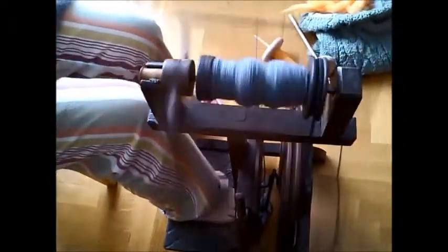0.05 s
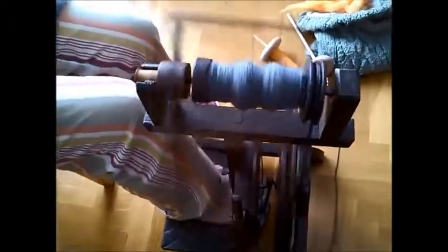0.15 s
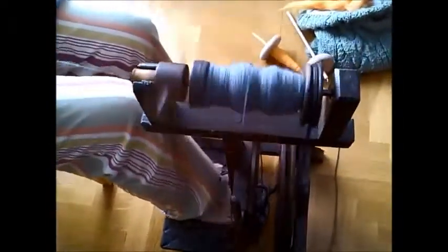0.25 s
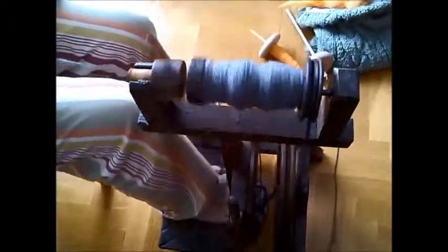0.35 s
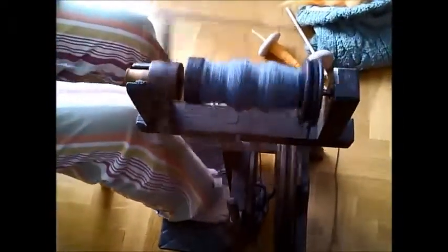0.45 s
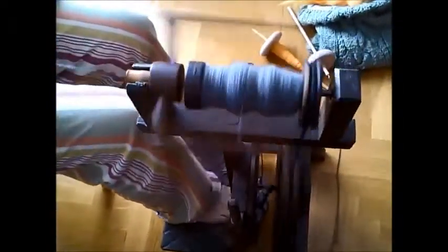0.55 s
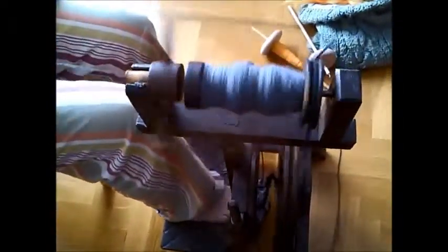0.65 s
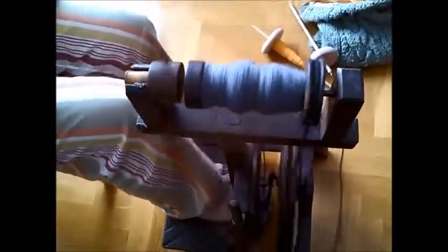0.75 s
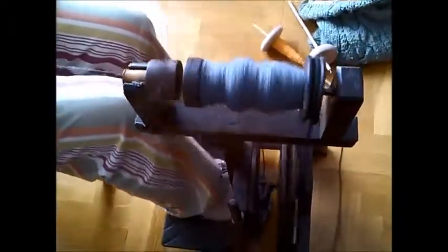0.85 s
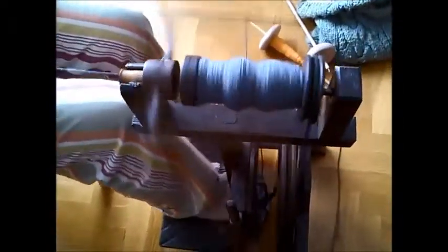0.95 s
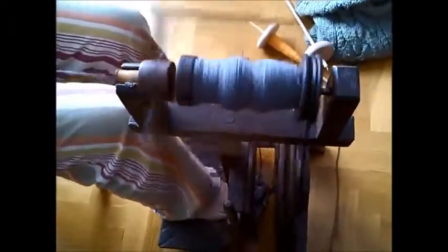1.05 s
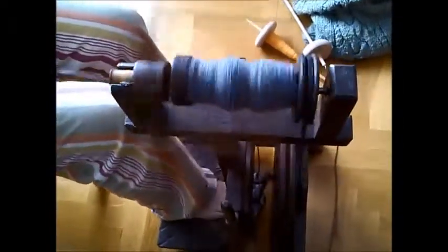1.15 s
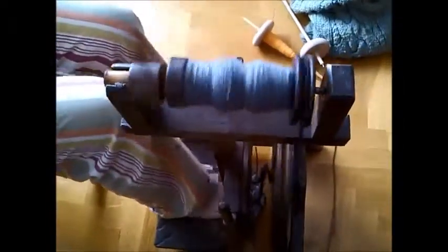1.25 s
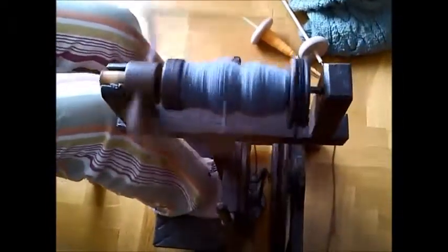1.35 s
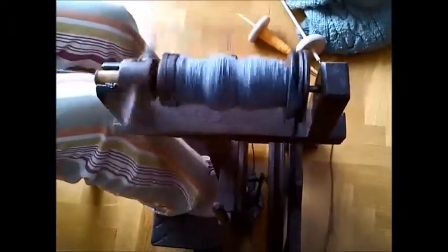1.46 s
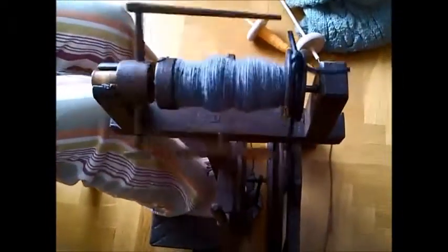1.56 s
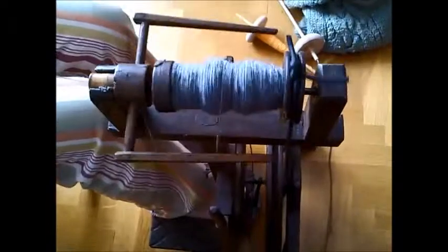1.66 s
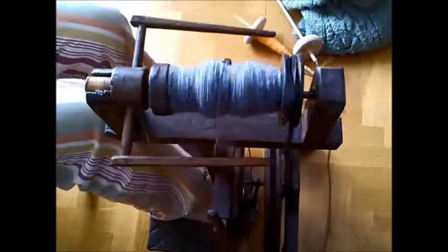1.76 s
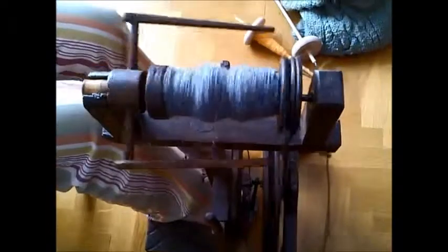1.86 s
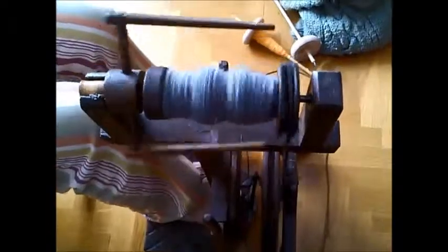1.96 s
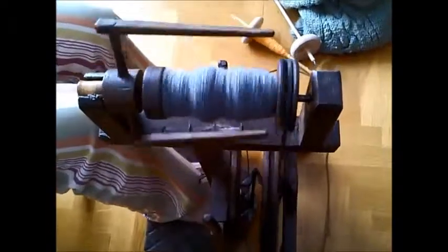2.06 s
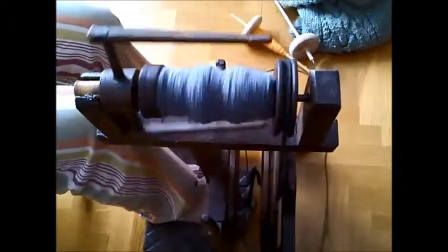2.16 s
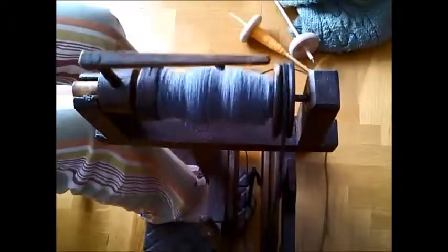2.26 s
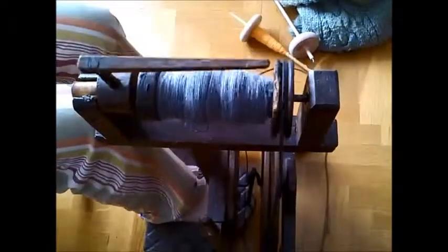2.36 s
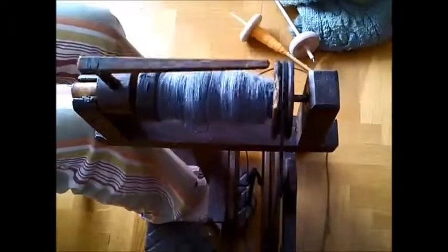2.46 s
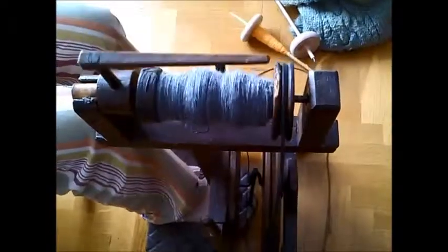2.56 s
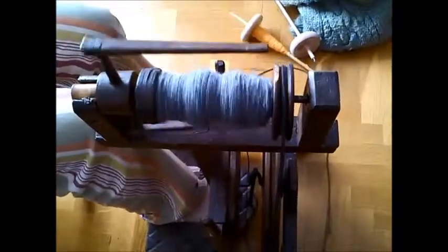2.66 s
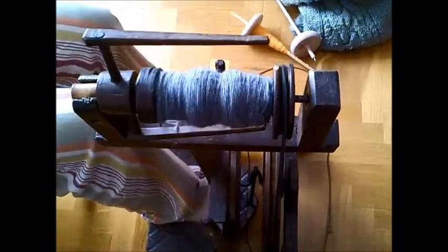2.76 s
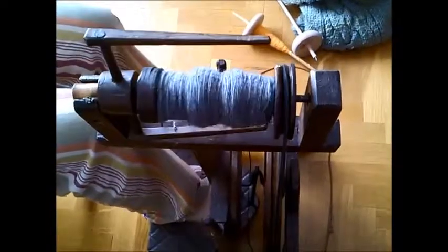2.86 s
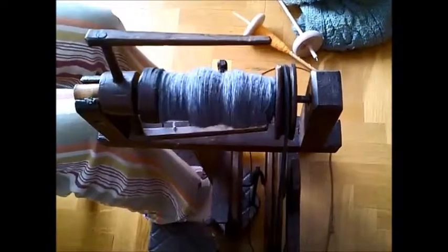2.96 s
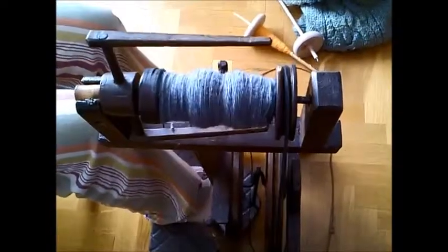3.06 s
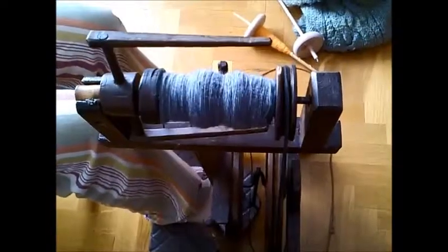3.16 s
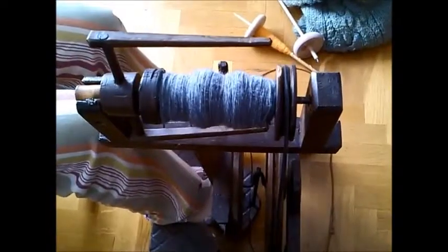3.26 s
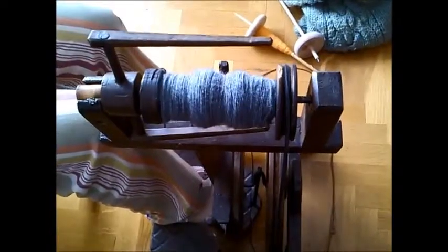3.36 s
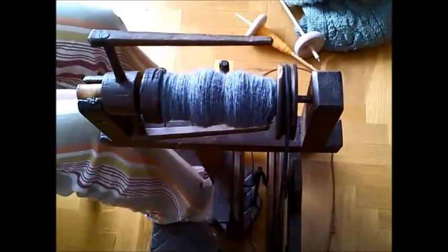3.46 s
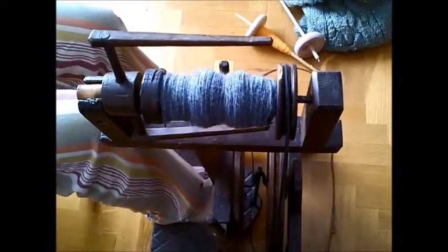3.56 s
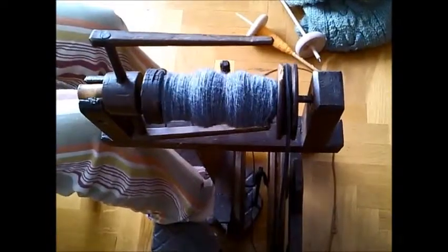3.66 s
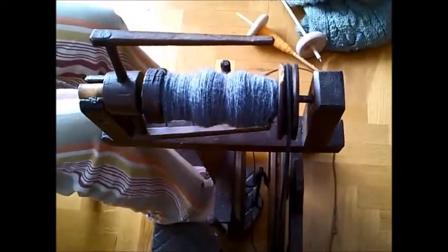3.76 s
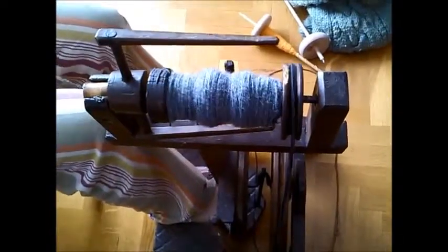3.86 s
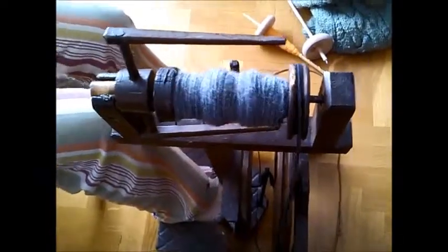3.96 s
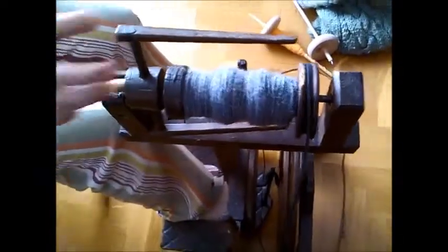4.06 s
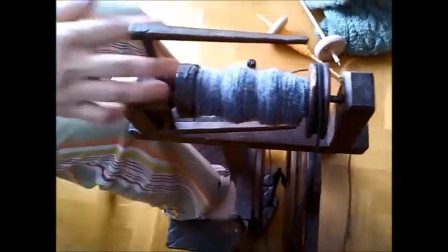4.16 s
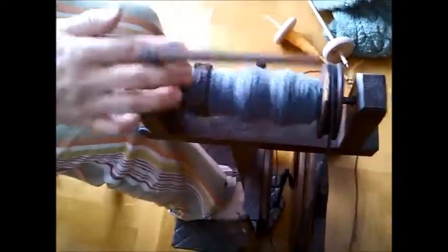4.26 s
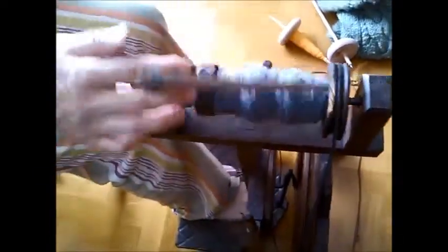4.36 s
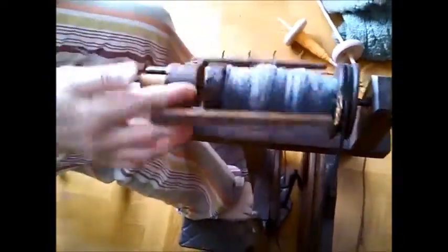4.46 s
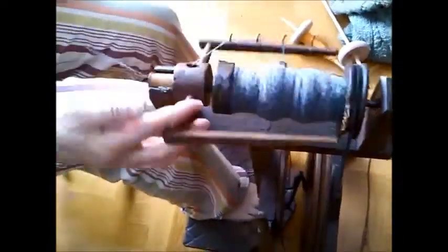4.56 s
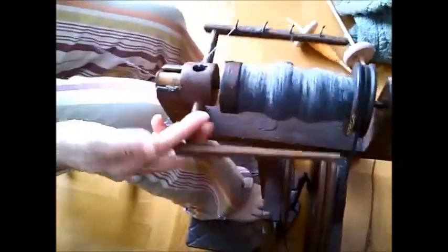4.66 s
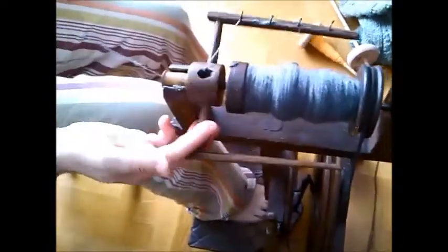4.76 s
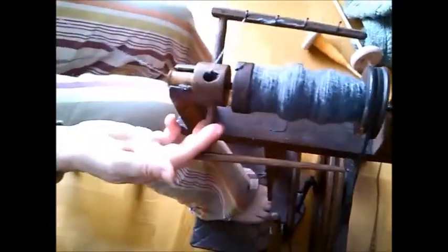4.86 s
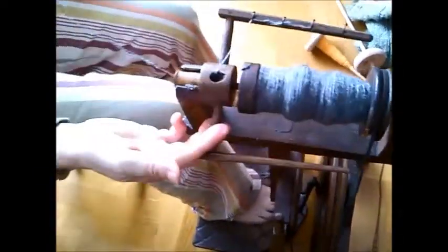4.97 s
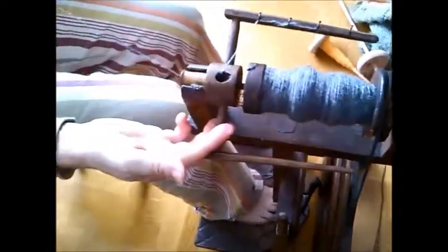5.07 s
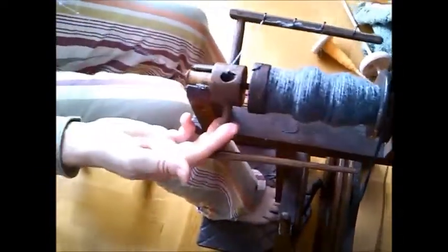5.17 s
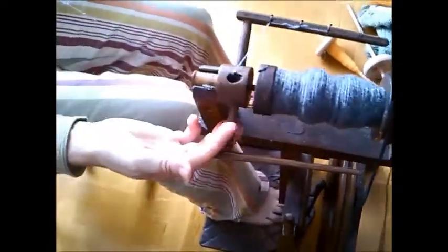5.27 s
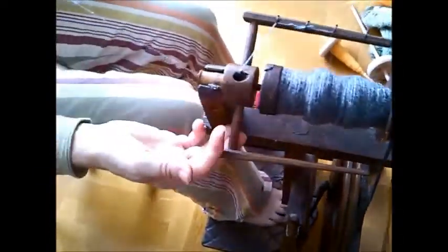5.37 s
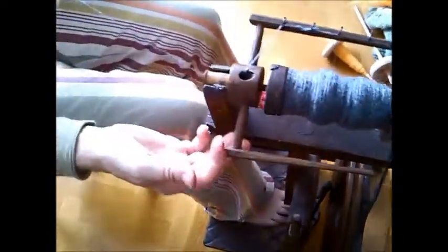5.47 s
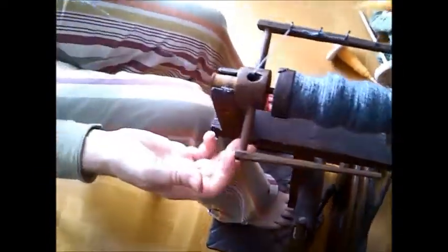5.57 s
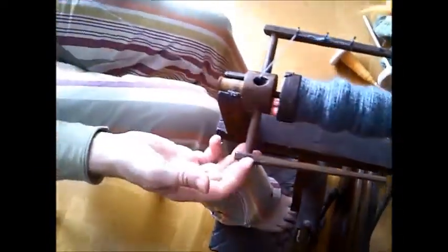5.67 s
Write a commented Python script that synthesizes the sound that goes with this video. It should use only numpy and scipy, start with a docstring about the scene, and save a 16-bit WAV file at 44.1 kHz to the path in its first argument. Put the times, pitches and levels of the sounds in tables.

```python
"""A wooden treadle spinning wheel in a small room, heard just above the flyer (its spinning arms).
At first flyer and bobbin clack in their loose bearings, rub, scrape and set the frame humming.
Near 1.4 s the wheel runs down, its shaft sticking and slipping, and the treadle gives a dull bump.
Around 2 s it turns once more and stops. Then come a faint whistle from the bearing, a few more
bumps, and light ticks as a hand turns the flyer."""
import sys
import numpy as np
from scipy import signal
from scipy.fft import rfft, irfft, next_fast_len
from scipy.io import wavfile
from scipy.ndimage import map_coordinates

SR = 44100
rng = np.random.default_rng(int(sys.argv[2]) if len(sys.argv) > 2 else 0)


def dump(signal):
    """Clip the signal to [-1, 1] and save it as 16-bit WAV at the path in sys.argv[1]."""
    limited = np.clip(np.atleast_2d(signal).T, -1, 1)
    pcm = np.round(limited * 32767).astype(np.int16)
    wavfile.write(sys.argv[1], SR, pcm)


N = 252673
TIME = np.arange(N) / SR

# Bump and whistle levels are final; the other sounds get their overall loudness later.
# the still room's hiss, bearing rub and a scrape's squeak: (frequency [Hz], level [dB])
QUIET_COLOUR = [(12, -49), (20, -13.5), (22, -19.5), (33, -23.5), (80, -23), (112, -28), (252, -33.5),
                (290, -32), (383, -35.5), (520, -36.5), (565, -38), (650, -39.5), (1540, -42.5),
                (2770, -47.5), (15600, -56)]
RUB_COLOUR = [(190, -3.5), (330, -11.5), (605, 5.5), (888, -13), (1220, -4), (2760, -7), (3450, -5.5),
              (4980, -14), (9000, -25), (13200, -30), (15000, -45)]
SQUEAK_COLOUR = [(3000, 5.5), (5000, 14), (8000, 4), (9200, -10), (10800, 2), (12000, -7), (13200, 1),
                 (15000, -24)]
# how alike both ears are, for that hiss and for all other noise: (frequency [Hz], likeness [-1 to 1])
QUIET_LIKENESS = [(60, 0.77), (150, 0.7), (380, 0.39), (950, 0.097), (2380, -0.19), (5980, -0.12),
                  (15000, 0.16)]
WHEEL_LIKENESS = [(200, 0.92), (600, 0.96), (1200, 0.63), (2500, 0.025), (6000, 0.029)]
# the frame's hum in the long run and in the last turn, and the rub in both: (time [s], level [dB])
HUM_LONG_RUN = [(0.0, -32.5), (0.1, -23.5), (0.164, -38.5), (0.352, -47), (0.398, -32.5), (0.528, -37.5),
                (0.56, -24), (0.758, -32.5), (0.784, -22.5), (0.844, -27), (0.868, -40), (0.968, -29.5),
                (1.088, -31.5), (1.12, -24.5), (1.152, -32), (1.222, -25.5), (1.428, -42), (1.65, -74)]
HUM_LAST_TURN = [(1.77, -67), (1.8, -34.5), (1.924, -51), (1.976, -28), (2.058, -47), (2.088, -27.5),
                 (2.116, -25), (2.142, -39.5), (2.5, -65)]
RUB_LEVELS = [(0, -27), (.28, -34.5), (.6, -30.5), (.85, -32), (1.05, -29), (1.32, -31.5), (1.5, -73),
              (1.8, -45), (1.98, -36), (2.15, -48), (2.33, -72)]
# notes at which the frame, and the flyer with its posts, ring: (frequency [Hz], width [Hz], level [dB])
FRAME_NOTES = [(179, 16.3, 8.5), (189.8, 9.4, 7.5), (230, 6.6, -17), (152.4, 27.5, 1), (317.6, 31, -6)]
FLYER_NOTES = [(515, 20.6, -19), (647, 31, 0.5), (731, 90, -2), (854, 97, 3.5), (1035, 81, 9),
               (1180, 110, 4.5), (1414, 73, 3), (1570, 120, -29), (2030, 70, 0.5), (2440, 160, -1),
               (2920, 110, -4), (3600, 220, -17), (4330, 150, -30)]
# the flyer's pulley scrapes: (peak time [s], level [dB], fade time [s], squeak [dB], hollow ring [dB])
SCRAPES = [(0.077, -33, 0.0094, -7, -7), (.581, -15.5, 0.014, -6, -8.5), (0.769, -30.5, 0.023, -10, -9),
           (1.449, -38.5, 0.041, -28, -5), (1.986, -29.5, 0.019, -16, -13), (2.015, -32, 0.021, 1, -5),
           (2.116, -32.5, 0.062, -20, -8)]
# the room's echo: (frequency [Hz], time to fade by 60 dB [s]) and (frequency [Hz], level [dB])
ECHO_FADE = [(200, 0.62), (1000, 0.2), (4000, 0.2), (12000, 0.24)]
ECHO_COLOUR = [(100, 10), (400, 4.5), (800, -3.5), (1600, -3), (4000, 1), (12000, -5.5)]
# the shaft's hard knocks, the slow flyer's light ticks: (time [s], level [dB], crack [dB], low swing [dB])
CLACKS = [(0.015, -12.5, -25.5, -15), (0.052, -12, -16, -14.5), (0.08, -11, -15.5, -11.5),
          (0.107, -12.5, -16, -15), (0.175, -21.5, -25, -5.5), (0.212, -17, -20.5, -6.5),
          (0.283, -12.5, -19.5, -15.5), (0.345, -12, -16.5, -11), (0.382, -10, -21, -11),
          (0.41, -14, -23, -19), (0.437, -11, -26, -12.5), (0.487, -16.5, -16.5, -10.5),
          (0.529, -11.5, -29, -31), (0.549, -5, -18, -19.5), (0.607, -10.5, -15.5, -14),
          (0.643, -9, -26.5, -24), (0.683, -16.5, -20, -21), (0.715, -10.5, -17, -12),
          (0.738, -12.5, -23, -16), (0.751, -8, -23, -20), (0.764, -13.5, -13.5, -15),
          (0.826, -7, -16.5, -12), (0.875, -17, -18.5, -11), (0.911, -17, -20, -16.5),
          (0.943, -7, -16.5, -12), (0.973, -11.5, -32, -20), (0.99, -17.5, -21.5, -17),
          (1.025, -10.5, -16, -18), (1.049, -13.5, -18.5, -10), (1.084, -10, -26, -25),
          (1.135, -14, -21.5, -22.5), (1.163, -7.5, -19.5, -15.5), (1.251, -12, -17.5, -19.5),
          (1.289, -9, -15, -13.5), (1.792, -14, -24, -25), (2.075, -17, -17, -6.5), (2.112, -23, -12, -14),
          (2.158, -19, -21, -5), (4.62, -23.5, -27, -13.5)]
TICKS = [(1.414, -21.5, -26.5, -21), (1.458, -27, -24, -18.5), (1.717, -43, -7, -5), (2.298, -36, -34, -10),
         (2.332, -42, -25, -18), (2.443, -41.5, -12.5, -8), (2.616, -29.5, -30, -10),
         (3.241, -43, -15.5, -7.5), (3.492, -43.5, -16, -5.5), (3.719, -41.5, -14, -6.5),
         (4.145, -36, -9, -9), (4.267, -43.5, -7.5, -1), (4.408, -30, -22.5, -20.5),
         (4.698, -33.5, -8.5, -10.5), (4.802, -34.5, -23, -14), (4.866, -48, -11, -1)]
# the low and the high swing (brief shudder) of the struck wood: (frequency [Hz], build-up [cycles])
CLACK_SWINGS = [(880, .42), (1450, .55)]
TICK_SWINGS = [(640, 0.78), (1250, 0.65)]
# the bright crack of each kind of knock: (frequency [Hz], level [dB])
CLACK_CRACK = [(1200, -23), (2300, -5), (3400, 2), (4400, -1.5), (5600, -7.5), (7000, -16), (10000, -22),
               (15000, -37)]
TICK_CRACK = [(1200, -20), (2000, -8), (3000, -7), (3700, -6), (4300, 1), (4900, -1), (5700, -14),
              (14000, -24)]
# the shaft sticks and slips: (start [s], length [s], slips [1/s], start level [dB], end level [dB])
JUDDERS = [(1.373, 0.073, 39, -27, -28), (1.869, 0.098, 67, -26.5, -28), (2.63, 0.0405, 55, -32.5, -42)]
# dull bumps of the treadle (the foot pedal): (time [s], level [dB])
TREADLE_BUMPS = [(1.598, -43), (2.88, -38), (3.523, -52), (4.801, -38), (5.435, -38.5)]
# the bearing whistles: (peak time [s], half length [s], level [dB])
WHISTLES = [(2.701, 0.14, -68), (3.1, .09, -70)]
# left-right balance of the treble as it is heard: (frequency [Hz], left minus right [dB])
TREBLE_BALANCE = [(1500, -0.5), (2600, 1.5), (3600, -2.5), (5000, -4), (6300, 1), (8000, 8.5), (10000, 9),
                  (14000, 17)]


def amp(db):
    """Turn decibels into a gain."""
    return 10 ** (np.asarray(db) / 20)


def unit(x):
    """Scale a sound to an average strength (rms) of 1."""
    return x / np.sqrt(np.mean(x ** 2) + 1e-20)


def along(points, hz):
    """Read between (frequency, value) rows on a log frequency scale."""
    known_hz, values = np.transpose(points)
    return np.interp(np.log(hz + 1), np.log(known_hz + 1), values)


def curve(rows):
    """Read between (time, value) rows at every sample."""
    return np.interp(TIME, *np.transpose(rows))


def wobble(rate):
    """A smooth random curve that heads for a new value rate times a second."""
    return map_coordinates(rng.standard_normal(int(N * rate / SR) + 4), [TIME * rate])


def tone(pitch_hz):
    """A pure tone that follows a changing pitch."""
    return np.sin(2 * np.pi * np.cumsum(pitch_hz) / SR)


def filtered(x, response):
    """Scale each frequency in x by response(frequency)."""
    n = x.shape[-1]
    padded = next_fast_len(n + n // 8)
    return irfft(rfft(x, padded) * response(np.fft.rfftfreq(padded, 1 / SR)), padded)[..., :n]


def resonances(notes, hz):
    """How a part that rings at these notes answers each frequency."""
    return sum((-1) ** k * amp(db) * 1j * hz * width / (centre ** 2 - hz ** 2 + 1j * hz * width)
               for k, (centre, width, db) in enumerate(notes))


def noise(colour, likeness=WHEEL_LIKENESS, size=N):
    """Stereo noise of strength 1, with the given colour and likeness between the ears."""
    def shape(hz):
        angle = np.arccos(np.clip(along(likeness, hz), -1, 1)) / 2
        return amp(along(colour, hz)) * [np.cos(angle), np.sin(angle)]
    mid, side = filtered(rng.standard_normal((2, size)), shape)
    return unit(np.array([mid + side, mid - side]))


def add(track, start_s, sound):
    """Mix a sound into the track at a given time."""
    i = max(0, round(start_s * SR))
    track[:, i:i + sound.shape[-1]] += sound[..., :max(0, N - i)]


def frame_hum(main_hz=183.5, partner_hz=212.6, throb_db=1.5):
    """The turning shaft makes the frame drone in two beating tones and shakes its low notes."""
    main = unit(tone(main_hz + 10 * wobble(45)) * amp(throb_db * wobble(60)))
    partner = unit(tone(partner_hz + 4 * wobble(20)) * amp(throb_db * wobble(60)))
    shake = unit(filtered(rng.standard_normal(N), lambda hz: resonances(FRAME_NOTES, hz)))
    level = amp(curve([*HUM_LONG_RUN, *HUM_LAST_TURN])) * np.interp(TIME, [2.3, 2.5], [1, 0])
    return level * (amp(-2) * main + amp(-8) * partner + amp(-9) * shake)


def rub_and_scrape(rub_db=-6.5, scrape_db=2.5, grain_db=2.5, rise_share=0.46):
    """Dry bearings rub in tiny slips; harder contacts swell into scrapes that squeak and ring a post."""
    rub = amp(curve(RUB_LEVELS) + rub_db) * np.interp(TIME, [2.2, 2.45], [1, 0])
    squeak, hollow = np.zeros((2, N))
    for peak_s, db, fade_s, squeak_db, hollow_db in SCRAPES:
        slope_s = fade_s * np.where(TIME < peak_s, rise_share, 1)
        swell = amp(db + scrape_db) * np.exp(-np.abs(TIME - peak_s) / slope_s)
        rub += swell
        squeak += amp(squeak_db) * swell
        hollow += amp(hollow_db) * swell
    slips = unit(amp(grain_db * wobble(400)))
    post = tone(FLYER_NOTES[1][0] + 30 * wobble(120))
    return slips * (rub * noise(RUB_COLOUR) + squeak * noise(SQUEAK_COLOUR)) + hollow * post


def wood_ring(x, floor_db, size=4096):
    """The wooden parts colour a sound with their notes; floor_db is what passes between the notes."""
    hz = np.fft.rfftfreq(size, 1 / SR)
    log_gain = np.log(amp(floor_db) ** 2 + np.abs(resonances(FLYER_NOTES, hz)) ** 2) / 2
    # this fold makes the wood ring only after the sound, never before (minimum phase)
    fold = np.concatenate([[1], np.full(size // 2 - 1, 2), [1], np.zeros(size // 2 - 1)])
    ring = irfft(np.exp(rfft(irfft(log_gain) * fold)))
    return signal.fftconvolve(x, ring[None], axes=1)[:, :N]


def room_echo(x, early_db=7, early_s=0.0035, pieces=28):
    """Sound bounces off the wheel, then round the room; the echo keeps changing as the flyer turns."""
    out, size = np.zeros((2, N)), SR * 2 // 5
    t = np.arange(size) / SR
    early_boost = (1 + amp(early_db) * np.exp(-t / early_s)) * (t > .001)
    for piece in np.array_split(np.arange(N), pieces):
        hz, age_s, spectrum = signal.stft(noise(ECHO_COLOUR, size=size), SR, nperseg=256)
        fade = amp(-60 * age_s / along(ECHO_FADE, hz)[:, None])
        tail = signal.istft(spectrum * fade, SR, nperseg=256)[1][:, :size] * early_boost
        tail /= np.linalg.norm(tail[0])
        add(out, piece[0] / SR, signal.fftconvolve(x[:, piece], tail, axes=1))
    return out


def knocks(hits, swings, crack_colour, crack_s, low_db, high_db, crack_db, ring_db, thump_db, delay_s):
    """Wood hits wood: two swings of a few cycles, a bright crack, a short ring and a frame thump."""
    out, t = np.zeros((2, N)), np.arange(SR // 8) / SR
    note_hz, width, note_db = np.transpose(FLYER_NOTES)[:, :, None]
    note_fade = np.exp(-np.pi * np.maximum(width, note_hz / 20) * t)
    note_shape = amp(note_db) * note_fade * (1 - np.exp(-t / 0.0004))
    frame_hz, frame_width, _ = FRAME_NOTES[0]
    thump_shape = np.exp(-np.pi * frame_width * t) * (1 - np.exp(-t / 0.0013))
    thump = amp(thump_db) * np.sin(2 * np.pi * frame_hz * t) * thump_shape
    burst = (t * np.exp(-t / crack_s))[:SR // 20]
    for time_s, db, hit_crack_db, hit_low_db in hits:
        # each blow lands somewhere else and shares itself out anew among the notes
        detune = np.exp(rng.normal(0, .05))
        share = amp(rng.normal(0, 2, width.shape))
        # a swing builds up while the parts press together and dies almost at once
        low, high = [-np.sin(2 * np.pi * hz * t) * hz * t / cycles * np.exp(-hz * t / cycles)
                     for hz, cycles in np.array(swings) * [detune, 1]]
        swing = amp(low_db + hit_low_db) * low + amp(high_db) * high
        notes = np.sin(2 * np.pi * (note_hz * t + rng.random(width.shape)))
        ring = amp(ring_db) * np.sum(share * note_shape * notes, 0)
        crack = unit(noise(crack_colour, size=len(burst)) * burst)
        add(out, time_s + delay_s, amp(db) * (swing + ring + thump))
        add(out, time_s + delay_s, amp(db + crack_db + hit_crack_db) * crack)
    return out


def rattle_hits(count=24, per_second=16, crack_db=-24, low_db=-3):
    """List the small, uneven knocks of the fast flyer; their strength follows the bearing rub."""
    shift, spread_db = rng.standard_normal((count, 2)).T
    times = np.abs(np.arange(count) + .5 + shift / 2) / per_second
    levels = np.interp(times, *np.transpose(RUB_LEVELS)) + 8.5 + spread_db
    levels += np.interp(times, [1.35, 1.45], [0, -60])  # gone as the wheel runs down
    return [(time_s, db, crack_db, low_db) for time_s, db in zip(times, levels)]


def judder_hits(jitter_s=.0006, crack_db=-21.5, low_db=-12):
    """List the nearly even, fading knocks made as the slow shaft sticks and slips."""
    return [(start + t + rng.normal(0, jitter_s), db + (end_db - db) * t / length, crack_db, low_db)
            for start, length, rate, db, end_db in JUDDERS for t in np.arange(0, length, 1 / rate)]


def treadle_bumps(push_s=0.0012):
    """Each bump of the treadle is one soft push that does not ring."""
    return sum(amp(db) * np.exp(-((TIME - time_s - .002) / push_s) ** 2) for time_s, db in TREADLE_BUMPS)


def bearing_whistle(pitch_hz=5260, waver_hz=45, flutter_db=4):
    """As the flyer settles, its bearing gives a thin, broken tone that swells and fades."""
    swell = sum(amp(db) * np.exp(-((TIME - peak_s) / half_s) ** 2) for peak_s, half_s, db in WHISTLES)
    return swell * amp(flutter_db * wobble(50)) * tone(pitch_hz + waver_hz * wobble(150))


def scene():
    """Mix the wheel and its room; the upper treble is heard more to the left, the lower to the right."""
    clatter = knocks([*CLACKS, *rattle_hits()], CLACK_SWINGS, CLACK_CRACK, crack_s=.00048,
                     low_db=16.5, high_db=7, crack_db=-9, ring_db=-33, thump_db=-34, delay_s=.0008)
    ticks = knocks([*TICKS, *judder_hits()], TICK_SWINGS, TICK_CRACK, crack_s=.00096,
                   low_db=12.5, high_db=5.5, crack_db=-10, ring_db=-21.5, thump_db=-30, delay_s=.0005)
    rubbing = wood_ring(rub_and_scrape(), floor_db=-3.5)
    echo = room_echo(amp(-3.5) * clatter + amp(1.5) * ticks + amp(-12) * rubbing)
    wheel = clatter + ticks + rubbing + wood_ring(echo, floor_db=0.5)
    wheel = filtered(wheel, lambda hz: amp(np.outer([.5, -.5], along(TREBLE_BALANCE, hz))))
    # the wheel's knocks, rubbing and echo carry no deep bass
    wheel = signal.sosfilt(signal.butter(2, 90, "high", fs=SR, output="sos"), wheel)
    hum = frame_hum() * amp([[-.3], [.3]])
    whistle = bearing_whistle()
    still_room = amp(-50.5) * noise(QUIET_COLOUR, QUIET_LIKENESS)
    return still_room + hum + wheel + treadle_bumps() + whistle


def record(dry, top_hz=15750, offset=.0437):
    """Cut the highest treble and lift the whole wave by a small, steady, silent offset."""
    return filtered(dry, lambda hz: hz < top_hz) + offset


dry = scene()
out = record(dry)
dump(out)
```